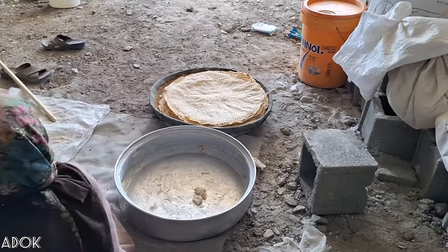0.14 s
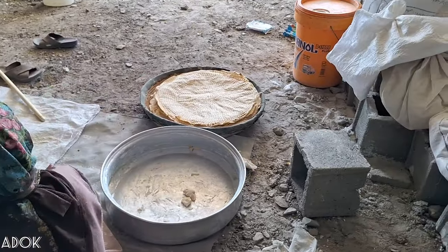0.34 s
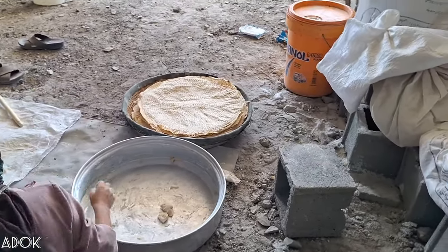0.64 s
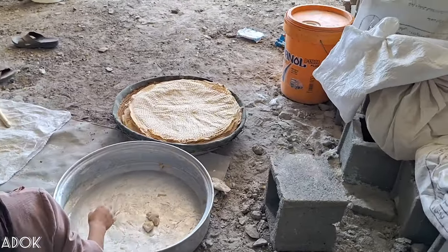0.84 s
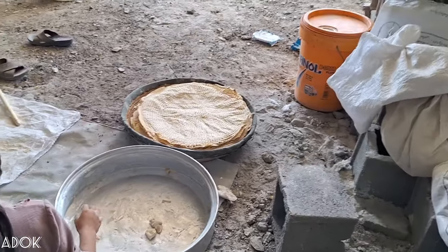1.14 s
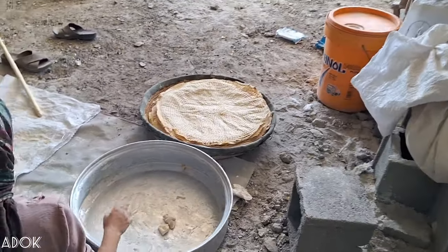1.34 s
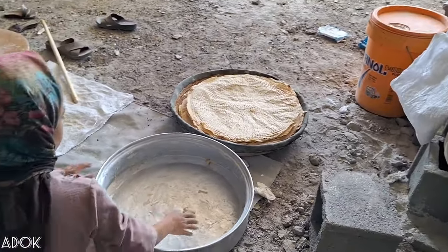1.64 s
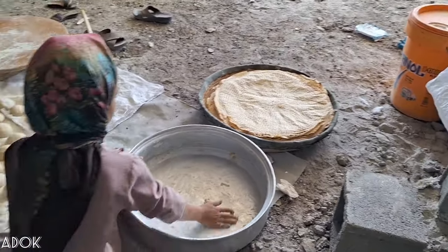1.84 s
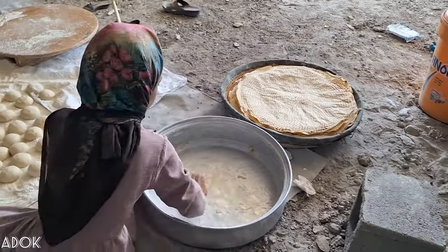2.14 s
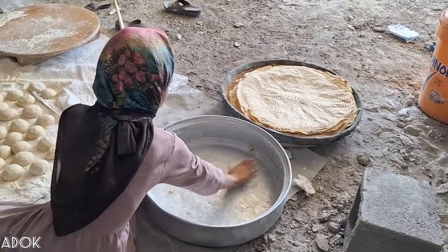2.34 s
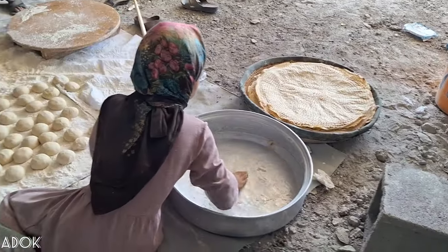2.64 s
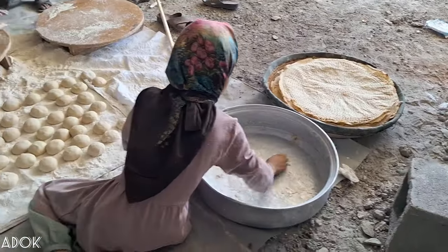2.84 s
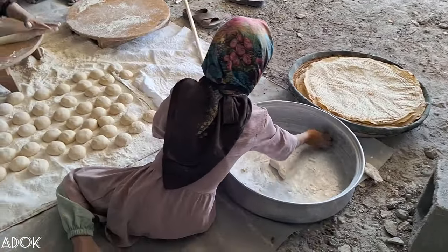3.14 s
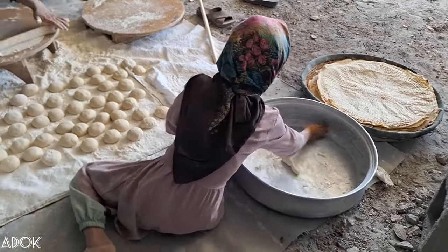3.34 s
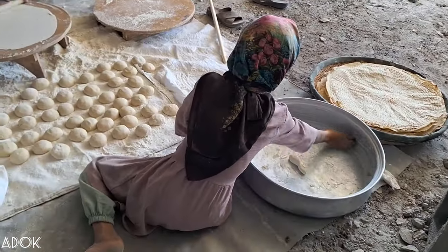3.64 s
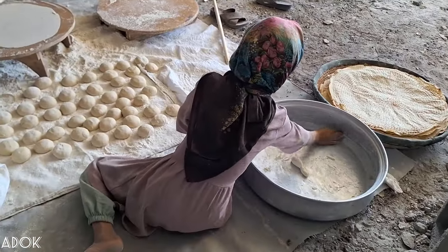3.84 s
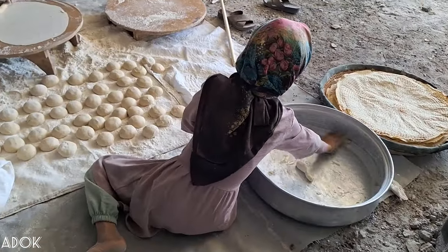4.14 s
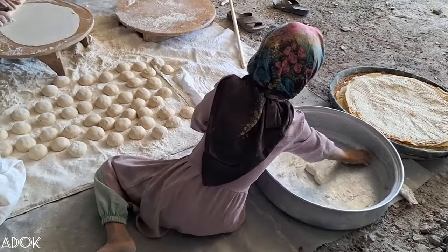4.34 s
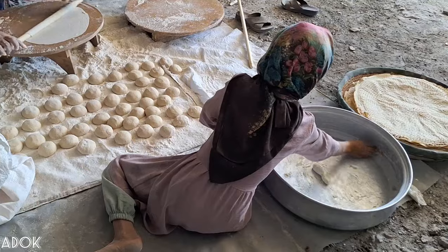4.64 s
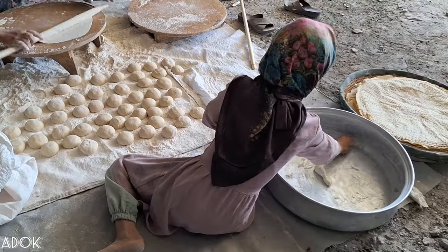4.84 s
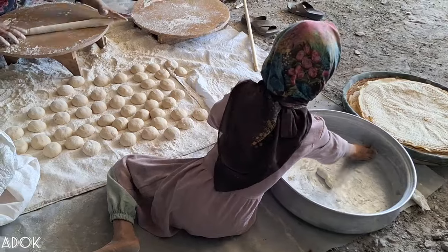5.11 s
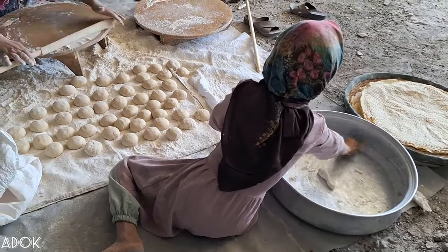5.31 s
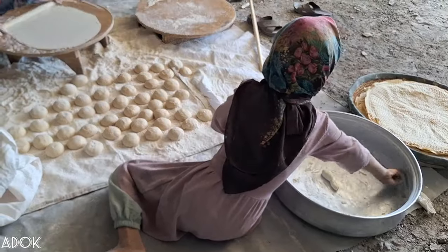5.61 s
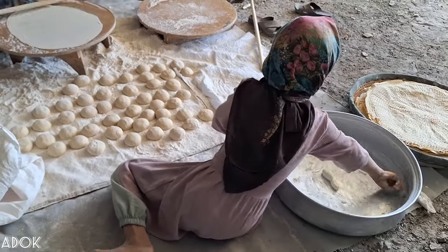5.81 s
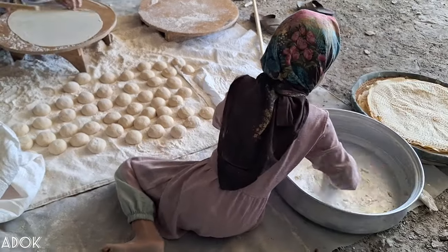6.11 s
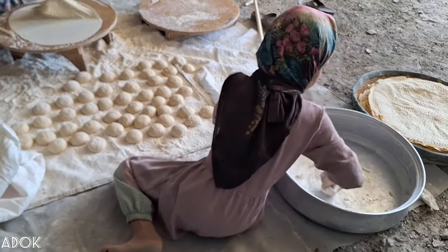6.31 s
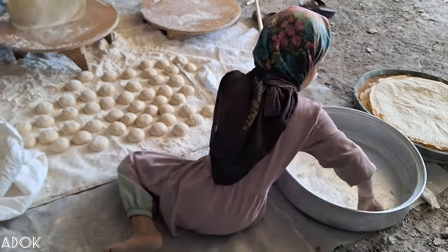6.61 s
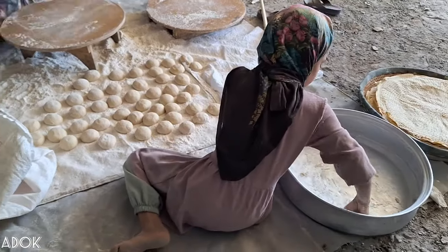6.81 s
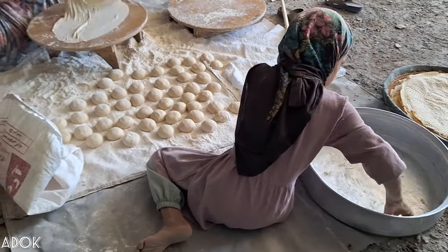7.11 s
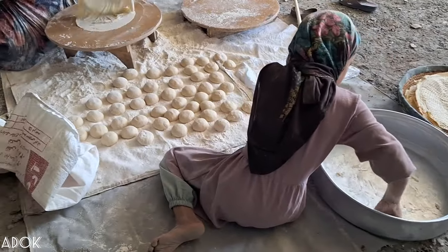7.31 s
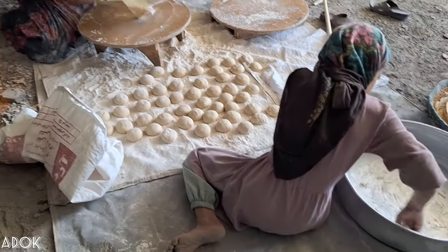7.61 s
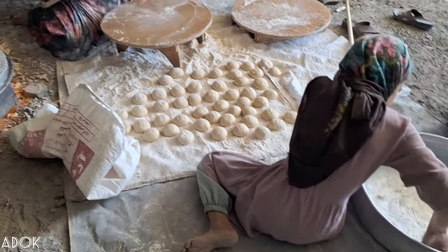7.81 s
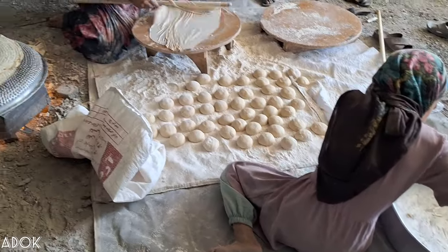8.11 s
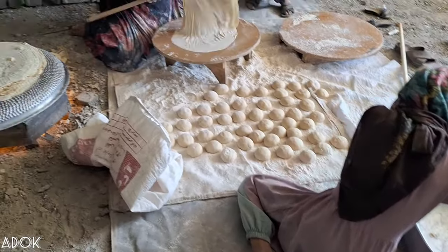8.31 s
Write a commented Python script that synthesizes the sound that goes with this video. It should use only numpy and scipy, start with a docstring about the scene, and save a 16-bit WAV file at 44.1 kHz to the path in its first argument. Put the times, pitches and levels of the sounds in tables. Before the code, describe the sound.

Flatbread is being made outdoors: a wooden pin rolls and lands on a board with hollow knocks and soft thuds, while hands rub and scrape flour in a metal basin. Crumbs and nails click, and the rubbing sometimes catches in tiny squeaks. Louder swishes and a wooden drag come toward the end. A faint gas burner hiss lies underneath, shifting slightly as the stereo microphone turns.

```python
"""A floury swish and a knock on wood: flatbread is being made on a gravel yard. A pin knocks and rolls
on a low wooden board, ringing its modes while the ground thuds along. Hands sweep flour over the board
and a wide metal basin, a gritty rub that now and then catches and sings; near the end the bare pin drags.
Crumbs and nails tick, and a gas burner hisses to one side of a turning handheld stereo microphone."""
import sys
import numpy as np
from scipy import signal
from scipy.fft import rfft, irfft, next_fast_len
from scipy.io import wavfile

SR = 44100
rng = np.random.default_rng(int(sys.argv[2]) if len(sys.argv) > 2 else 0)


def master_out(mix):
    """Clip the mix to full scale and print it as 16-bit PCM to the path in sys.argv[1]."""
    frames = np.transpose(np.atleast_2d(mix))
    ceiling = np.clip(frames, -1, 1)
    pcm = np.round(ceiling * 32767).astype(np.int16)
    wavfile.write(sys.argv[1], SR, pcm)


N = 373086
PADDED = next_fast_len(N + SR // 5, real=True)
HZ = np.maximum(np.arange(PADDED // 2 + 1) * SR / PADDED, 1)
FLANK_DB, ROUNDNESS = 20, 1.5   # a gesture's drop one swell before or one fade after its peak; its curve


def amp(db):
    """Decibels to gain."""
    return 10 ** (np.asarray(db) / 20)


def in_time(rows):
    """Each column of an automation table, one value per sample."""
    times, *columns = np.transpose(rows)
    return [np.interp(np.arange(N) / SR, times, column) for column in columns]


def over_hz(points):
    """A curve spread over all frequencies on a log axis."""
    hz, value = np.transpose(points)
    return np.interp(np.log(HZ), np.log(hz), value)


def modes(table, share):
    """A body's response: a flat path blended with resonances of alternating sign."""
    ring = sum((-1) ** k * amp(level_db) * 1j * HZ * width / (hz ** 2 - HZ ** 2 + 1j * HZ * width)
               for k, (hz, width, level_db) in enumerate(table))
    return 1 - share + share * 4 * ring


def drift(rate_hz):
    """A slow random wobble of spread 1."""
    pole = np.exp(-80 * np.pi * rate_hz / SR)
    slow = signal.lfilter([1], [1, -2 * pole, pole * pole], rng.standard_normal(N // 40 + 2002))[2000:]
    return np.interp(np.arange(N) / 40, np.arange(len(slow)), slow / slow.std())


def grit(rough_db, slip_db, slip_hz):
    """Dense, uneven grains that catch and slip, in three streams: common, left, right."""
    size = amp(rough_db * np.minimum(rng.exponential(1, N), 5) + slip_db * drift(slip_hz))
    grains = size * rng.standard_normal((3, N))
    return grains / grains.std()


def gestures(rows, idle_db):
    """One force envelope a layer: each row swells and fades, adding in power over a resting level."""
    t = np.arange(0, N + 64, 64) / SR
    peak_s, swell, fade, level_db, *layers_db = np.transpose(rows)[:, :, None]
    away = np.abs(t - peak_s) / np.maximum(np.where(t < peak_s, swell, fade), 1 / SR)
    shape_db = level_db - FLANK_DB * away ** ROUNDNESS
    powers = [np.sum(amp(shape_db + layer_db) ** 2, axis=0) + amp(rest_db) ** 2
              for layer_db, rest_db in zip([0] + layers_db, idle_db)]
    return [np.interp(np.arange(N) / SR, t, np.sqrt(power)) for power in powers]


def ringing(rubbing, table, wander_db):
    """Rubbed modes that swell and fade as the contact moves over the body."""
    out = 0
    for hz, width, level_db in table:
        r = np.exp(-np.pi * width / SR)
        ring = signal.lfilter([1 - r * r], [1, -2 * r * np.cos(2 * np.pi * hz / SR), r * r], rubbing)
        out = out + amp(level_db + wander_db * drift(7)) * ring
    return out


# How alike the two microphone ports sound: (frequency [Hz], likeness [0-1])
PORT_LIKENESS = [(60, 0.79), (290, 0.99), (700, 0.87), (1500, 0.12), (5000, 0.16), (15000, 0.08)]
# How far the left port leads: (frequency [Hz], phase [rad])
PORT_LEAD = [(0, 0), (900, -1.43), (1810, 5), (2500, 7), (16000, 53.5)]
# Shading between the ports: (frequency [Hz], left minus right [dB])
PORT_SHADE = [(60, -11), (130, 3), (400, 0), (1200, 0.5), (2800, -7.5), (6000, 0.5), (9500, -4.5),
              (14000, -5)]
def heard(grains, force, response):
    """Grains under a force ring through a body and reach both ports; the force sets the mid level."""
    common, left, right = rfft(grains * force, PADDED)
    alike = np.clip(over_hz(PORT_LIKENESS), 0, 1)
    late = np.exp(-1j * np.interp(HZ, *np.transpose(PORT_LEAD)))
    shade = amp(over_hz(PORT_SHADE) / 2)
    mid_power = (shade ** 2 + shade ** -2 + 2 * alike * late.real) / 4
    response = response / np.sqrt(np.mean(np.abs(response) ** 2 * mid_power))
    shared = np.sqrt(alike) * common * [np.ones_like(late), late]
    diffuse = np.sqrt(1 - alike) * np.array([left, right])
    return irfft((shared + diffuse) * response * [shade, 1 / shade], PADDED)[:, :N]


# Whistles of the gas jets: (frequency [Hz], width [Hz], level [dB])
JET_WHISTLES = [(3900, 150, -2), (4600, 40, 6), (6720, 40, 3), (10330, 80, 5), (11500, 50, 1),
                (13250, 50, 9)]
# Tone of the burner and the yard: (frequency [Hz], level [dB])
BURNER_EQ = [(18, -45), (30, 2.5), (75, 13), (437, -23), (554, -2), (822, -12), (1670, 3.5), (2480, 0),
             (3870, 4.5), (7270, -4), (8300, -6), (9970, -1), (13000, -7), (16000, -4)]
def burner(level_db):
    """The bed: smooth jet noise with faint whistles over the hush of the yard."""
    tone = modes(JET_WHISTLES, share=0.35) * amp(over_hz(BURNER_EQ))
    return heard(grit(0.2, 1.0, 8.5), amp(level_db), tone)


# Wooden modes of the board: (frequency [Hz], width [Hz], level [dB])
BOARD_MODES = [(115.2, 16, 4.5), (225.5, 20, 2.5), (250.7, 13, -4), (287.6, 21.7, -2), (357, 41.5, -7),
               (437, 65, -2.5), (524, 43, -2.5), (593.8, 27.3, 1), (796, 17, -6.5), (901, 45, -1),
               (1125, 5.1, -7.5), (1304, 23, -3.5)]
# Tone of the board's rumble and of the ground's thud: (frequency [Hz], level [dB])
RUMBLE_EQ = [(76, -45), (130, -6.5), (351, 3.5), (479, 3), (587, -2), (700, 10), (910, -24), (1540, -120)]
GROUND_EQ = [(15, -57), (25, -38), (41, -12.5), (80, -3), (114, -5), (160, -11), (210, -15.5), (350, -120)]
# Pin and dough pressing the board, one row a roll:
# (peak time [s], swell [s], fade [s], rumble [dB], thud over rumble [dB], upper modes over rumble [dB])
PIN_ROLLS = [(0.45, 0.041, 0.15, -69, 8, 2), (1.0, 0.15, 0.22, -56, -15, -5.5),
             (1.45, 0.22, 0.12, -56.5, -9, -16.5), (1.79, 0.026, 0.19, -49, -8, -1),
             (2.26, 0.14, 0.15, -59, -9, 5), (2.62, 0.082, 0.082, -54.5, -18, 5.5),
             (2.82, 0.19, 0.19, -53, -22, -5), (3.17, 0.24, 0.73, -57, -15, -6.5),
             (3.41, 0.12, 0.32, -53.5, 2, -19), (3.88, 0.11, 0.22, -47, -24, -7.5),
             (4.37, 0.41, 0.13, -68.5, 1.5, 1.5), (4.86, 0.39, 0.18, -65.5, -4, -2.5),
             (5.19, 0.32, 0.22, -61.5, -42, -1.5), (5.48, 0.057, 0.23, -55, -8, -22),
             (5.62, 0.13, 0.99, -68.5, -4, -8.5), (6.18, 0.061, 0.1, -53.5, -8, -10),
             (6.59, 0.029, 0.18, -57, 7, 4.5), (6.8, 0.12, 0.12, -61, 7.5, 5.5),
             (7.05, 0.076, 0.073, -46, -8, 6.5), (7.36, 0.32, 0.094, -64, 2, -1.5),
             (7.71, 0.1, 0.14, -53, 0.5, -7.5), (8.1, 0.062, 0.086, -55, -9, 14.5),
             (8.33, 0.59, 0.23, -58, -2.5, -19)]
def board_rumble():
    """The low end: rolls and knocks shake the board, hard rolls its upper modes; the ground thuds along."""
    rolling, thud, upper = gestures(PIN_ROLLS, idle_db=[-83, -76.5, -83])
    force = np.hypot(rolling, knock_force("board"))
    tone = modes(BOARD_MODES, share=0.53) * amp(over_hz(RUMBLE_EQ))
    rumble = heard(grit(2.1, 1.55, 33), force, tone)
    low, high = [signal.sosfilt(signal.butter(4, 330, side, fs=SR, output="sos"), rumble)
                 for side in ("low", "high")]   # the upper modes start at 330 Hz
    ground = heard(grit(3.8, 3.5, 8.4), thud, amp(over_hz(GROUND_EQ)))
    return low + high * upper / rolling + ground


# Metal modes of the basin: (frequency [Hz], width [Hz], level [dB])
BASIN_MODES = [(1796, 120, -15.5), (2037, 29, -6.5), (2366, 88, -9.5), (2785, 170, -13.5), (3014, 72, -8.5),
               (3253, 42, -9), (3726, 42, -8), (4560, 17, -14)]
def basin(contact, wander_db):
    """The wide metal basin rings under a scrape or a rattle."""
    return ringing(contact, BASIN_MODES, wander_db)


# Crumbs and nails ticking: (time [s], level before panning [dB], pitch [Hz], rattle over click [dB])
CRUMB_TICKS = [(0.1458, -27, 10600, -25), (0.153, -30.5, 4380, -24), (0.512, -27, 3100, -16),
               (0.831, -38, 1780, -10), (1.182, -34, 1200, -22), (1.2185, -16.5, 3100, -7.5),
               (1.2202, -18, 3100, -15), (1.752, -28, 2860, -1.5), (2.432, -40, 1880, -1),
               (2.473, -45, 1250, -1), (2.834, -37, 1650, -17), (3.052, -39, 1215, -5),
               (3.293, -35, 3060, 4), (3.704, -38.5, 2880, -3), (5.287, -38, 1954, -8),
               (5.715, -37, 2620, 2), (8.253, -31, 1490, -7), (8.272, -29.5, 1910, -17),
               (8.324, -25.5, 1900, -28)]
def crumbs():
    """A rounded click, then a short rattle that rings the basin; left hears it sooner and softer."""
    clicks, rattles = np.zeros((2, 2, N + SR))
    t, lead = np.arange(SR // 5) / SR, round(0.0005 * SR)
    noises = rng.standard_normal((len(CRUMB_TICKS), 2, len(t)))
    for (start_s, level_db, hz, rattle_db), noise in zip(CRUMB_TICKS, noises):
        contact_s = min(0.0002, 0.7 / hz)
        click = np.sin(2 * np.pi * hz * t) * t / contact_s * np.exp(1 - t / contact_s)
        band = signal.butter(2, [hz / 1.5, hz * 1.5], "band", fs=SR, output="sos")
        rattle = amp(rattle_db - 60 * t / 0.13) * signal.sosfilt(band, noise)
        start = round(start_s * SR)
        for side, (at, side_db) in enumerate([(start - lead, -8), (start, -1)]):
            clicks[side, at:at + len(t)] += amp(level_db + side_db) * click
            rattles[side, at:at + len(t)] += amp(level_db + side_db) * rattle[side]
    return (clicks + rattles)[:, :N] + basin(rattles[:, :N] + 1e-18, wander_db=-2)


# Squeaks in the rub: (peak time [s], swell [s], fade [s], level before panning [dB], pitch [Hz])
RUB_CATCHES = [(0.549, 0.021, 0.11, -49, 1255), (1.79, 0.033, 0.31, -55, 2280),
               (1.872, .015, 0.029, -46.5, 4510), (2.28, 0.046, 0.07, -49.5, 2830),
               (4.52, .03, .05, -56.5, 2230), (4.6, .05, .03, -61.5, 1740), (5.3, 0.013, .025, -57, 1640),
               (7.545, 0.024, 0.057, -47, 1840), (7.605, 0.026, 0.042, -43.5, 1340),
               (7.762, 0.023, 0.051, -44, 3480), (8.195, 0.059, 0.033, -39, 3280),
               (7.608, .02, 0.027, -45, 3350), (7.76, .025, 0.026, -49, 1810),
               (3.39, 0.041, .05, -50, 1050), (5.61, 0.088, .05, -55, 3000)]
def catches():
    """The rubbing catches and briefly sings: noise in one narrow resonance, leaning right."""
    out, half = np.zeros((2, N + SR)), SR // 3
    t = np.arange(-half, half) / SR
    r = np.exp(-np.pi * 85 / SR)   # 85 Hz wide
    noises = rng.standard_normal((len(RUB_CATCHES), 2, len(t)))
    for (peak_s, swell, fade, level_db, hz), noise in zip(RUB_CATCHES, noises):
        sung = signal.lfilter([1], [1, -2 * r * np.cos(2 * np.pi * hz / SR), r * r], noise)
        sung /= sung.std(axis=1, keepdims=True)
        shape_db = level_db - FLANK_DB * (np.abs(t) / np.where(t < 0, swell, fade)) ** ROUNDNESS
        at = round(peak_s * SR) - half
        out[:, at:at + len(t)] += amp(shape_db) * sung * amp([[-3], [3]])
    return out[:, :N]


# Bending modes of the pin: (frequency [Hz], width [Hz], level [dB])
PIN_MODES = [(1042, 15, -2), (1363, 70, -7.5), (1592, 46, -2), (1790, 70, -9), (3277, 35, 5.5),
             (3450, 24, -5)]
def pin_drag(force):
    """The bare pin drags over the board and friction rings its bending modes."""
    friction = heard(grit(3.0, 2.0, 20), force, amp(over_hz(WOOD_EQ)) + amp(over_hz(SCRAPE_EQ)))
    return amp(-7.5) * ringing(friction, PIN_MODES, wander_db=4)


# Tone of coarse scrape, fine flour and hollow wood: (frequency [Hz], level [dB])
SCRAPE_EQ = [(940, -36), (1600, -7), (2560, -2.5), (3340, 4.5), (4570, -1.5), (5200, -6), (6760, -9.5),
             (11400, -120)]
FLOUR_EQ = [(2820, -19), (4800, -5.5), (6460, -2.5), (7440, -1), (8400, -11.5), (9720, -6), (11700, -6.5),
            (15100, -14.5), (16000, -0.5)]
WOOD_EQ = [(350, -37), (600, 0), (690, 1), (1340, 7), (1900, 4.5), (2470, -9), (4180, -120)]
# Crossfade from hands to the bare pin: (time [s], share of the rubbing [0-1])
PIN_SHARE = [(0, 0), (7.3, 0.06), (7.41, 0.68), (8.0, 0.67), (8.03, 0), (8.15, 0.24), (8.3, 0.81),
             (8.46, 0.85)]
# Hands sweeping flour, one row a stroke:
# (peak time [s], swell [s], fade [s], scrape [dB], hiss over scrape [dB], wood over scrape [dB])
HAND_SWEEPS = [(0.03, 0.42, 0.14, -60.5, -2.5, -7.5), (0.54, 0.18, 0.35, -56.5, -3.5, -12),
               (0.95, 0.17, 0.26, -58, -3.5, -7.5), (1.18, 0.22, 0.17, -51.5, 2, -9.5),
               (1.53, 0.25, 0.29, -51.5, 1.5, -9.5), (1.8, 0.02, 0.6, -47.5, -22, -9),
               (1.94, 0.065, 0.14, -50, 2, -6), (2.275, 0.12, 0.12, -46, -2, -7),
               (2.63, 0.15, 0.12, -48, -1, -4), (2.78, 0.075, 0.3, -58.5, -3, -4.5),
               (3.17, 0.18, 0.9, -52.5, -1, -5), (3.4, 0.14, 0.085, -44.5, -7.5, -3),
               (3.58, 0.5, 0.18, -55, 3.5, -23), (3.8, 0.36, 0.31, -55.5, -37, -19.5),
               (4.0, 0.17, 0.12, -51.5, -17, -5.5), (4.39, 0.08, 0.15, -61, -0.5, -3.5),
               (4.53, 0.11, 0.79, -57, -9, -32), (4.85, 0.11, 0.59, -59.5, -21, -26),
               (5.23, 0.26, 0.13, -52, -1.5, -13), (5.54, 0.15, 0.28, -56.5, 5.5, -4.5),
               (5.735, 0.44, 0.043, -48, -5.5, -14), (5.9, .2, 0.26, -55.5, -25, -20),
               (6.3, 0.37, 0.2, -63.5, -12, -3), (6.58, 0.015, 0.11, -49.5, -3, 4),
               (6.8, .2, 0.15, -49.5, -5, 0), (6.985, 0.023, 0.18, -37.5, -6, -12),
               (7.06, 0.056, 0.063, -33, -5.5, -2), (7.3, 0.18, 0.13, -53.5, -3.5, -1),
               (7.43, 0.02, 0.072, -46, -6.5, -31), (7.535, 0.029, 0.19, -45, -12, -25),
               (7.61, 0.12, 0.22, -48.5, -5, 0), (7.76, 0.11, 0.096, -45.5, -5.5, -6),
               (7.89, 0.078, 0.097, -43, -8, -9.5), (8.04, 0.033, 0.15, -49, 5.5, 7),
               (8.1, 0.079, 0.13, -35.5, -3.5, -3.5), (8.2, 0.091, 0.13, -49.5, -6, 0),
               (8.37, 0.07, 0.073, -43.5, -11, -7.5), (8.44, 0.043, 0.16, -41.5, -13, -12)]
def sweeps(basin_share):
    """Strokes and slaps drive coarse grit, flour hiss, hollow wood and the ring of basin or pin."""
    coarse, fine, woody = gestures(HAND_SWEEPS, idle_db=[-75, -72, -86])
    on_pin, in_basin = np.clip(in_time(PIN_SHARE)[0], 0, 1), np.clip(basin_share, 0, 1)
    slap = knock_force("slap")
    rub, hollow = np.hypot(coarse, slap), np.hypot(woody, knock_force("wood"))
    grains = grit(2.14, 1.3, 28.5)   # shared by scrape and hiss
    scrape = heard(grains, rub * np.sqrt(1 - on_pin), amp(over_hz(SCRAPE_EQ)))
    hiss = heard(grains, np.hypot(fine, amp(-6) * slap), amp(over_hz(FLOUR_EQ)))
    wood_tone = modes(BOARD_MODES, share=0.48) * amp(over_hz(WOOD_EQ))
    wood = heard(grit(2.54, 2.17, 29), hollow * np.sqrt(1 - on_pin), wood_tone)
    pin = pin_drag(np.hypot(rub, hollow) * np.sqrt(on_pin))
    metal = basin(scrape * np.sqrt(in_basin), wander_db=4)
    return scrape * np.sqrt(1 - in_basin) + metal + hiss + wood + pin


# Pin or palm landing on the board: (time [s], relative level [dB], wood over level [dB],
# slap over level [dB], pitch of the spot [Hz], time for the force to fall 60 dB [s])
LANDINGS = [(0.11, -43.5, -7, -2, 208, 0.17), (0.525, -40, 9.5, -18, 228, 0.31),
            (0.979, -52, 4, 6, 297, 0.24), (1.588, -40, -4.5, -20, 546, 0.3),
            (1.75, -36.5, -5.5, -10, 248, 0.44), (2.731, -40.5, 4, 6.5, 580, 0.13),
            (3.818, -42.5, -0.5, -5.5, 400, 0.42), (3.921, -41, -22, -8, 228, 0.37),
            (4.614, -50, -3.5, 1, 555, 0.46), (4.8, -51, -23, -14, 125.8, 0.43),
            (5.181, -42, -5, -14, 292, 0.11), (5.461, -42, -8, -33, 110, 0.072),
            (6.152, -50, -1.5, -17, 220, 0.54), (6.568, -34.5, 9.5, 5.5, 276, 0.17),
            (6.63, -36, -27, -32, 113, 0.073), (6.969, -45.5, 14.5, 17, 590, 0.21),
            (7.656, -45.5, 11, -8, 600, 0.18), (8.024, -41.5, -5, -6, 370, 0.29)]
def knock_force(layer):
    """Each landing gives the "board", "wood" or "slap" noise layer a sudden push that dies away."""
    force, t = np.zeros(N + SR), np.arange(SR // 2) / SR
    for start_s, level_db, wood_db, slap_db, _, t60 in LANDINGS:
        layer_db = {"board": 0, "wood": wood_db, "slap": slap_db}[layer]
        at = round(start_s * SR)
        force[at:at + len(t)] += amp(level_db + layer_db - 12 - 60 * t / t60)
    return force[:N]


def knocks():
    """A landing rings the low board modes near the struck spot's pitch, the top ones by its hardness."""
    out, t = np.zeros(N + SR), np.arange(SR // 3) / SR
    hz, width, mode_db = np.transpose(BOARD_MODES)[:, :, None]
    variations_db = 2.5 * rng.standard_normal((len(LANDINGS), len(BOARD_MODES), 1))
    for (start_s, level_db, wood_db, _, spot_hz, t60), vary_db in zip(LANDINGS, variations_db):
        struck_db = np.where(hz > 1000, wood_db - 16.5, -25 * np.log2(hz / spot_hz) ** 2) + vary_db
        decay = np.exp(-np.pi * width * t * 0.12 / t60)   # a 0.12 s landing keeps the listed widths
        rings = amp(level_db - 10 + mode_db + struck_db) * decay * np.sin(2 * np.pi * hz * t)
        at = round(start_s * SR)
        out[at:at + len(t)] += rings.sum(0)
    return out[:N]


# Automation as the microphone turns:
# (time [s], burner level [dB], treble left minus right [dB], share of the scrape in the basin [0-1])
MIC_TURN = [(0, -68, -12, 0.89), (1, -64, -10.5, 0.13), (1.6, -59, -7.5, 0.65), (3.2, -62.5, -6.5, 0.7),
            (4, -66.5, -8.5, 0.81), (5, -66.5, -8.5, 0.7), (5.7, -73, -7, 0.87), (6.4, -66, -8.5, 0.62),
            (7, -64, -7, 0.27), (8.46, -72, -7, 0.04)]
def scene():
    """The bright layers swing between the ports as the microphone turns; rumble and knocks stay put."""
    burner_db, pan_db, basin_share = in_time(MIC_TURN)
    swing = amp((pan_db + 5.5) / 2 * np.array([[1], [-1]]))   # about the left port's usual 5.5 dB shade
    bright = sweeps(basin_share) + burner(burner_db) + crumbs() + catches()
    return bright * swing + board_rumble() + knocks()


def record(dry):
    """The microphone rolls off below 40 Hz; the top is cut steeply at 16 kHz."""
    thin = signal.sosfilt(signal.butter(2, 40, "high", fs=SR, output="sos"), dry)
    return signal.sosfilt(signal.cheby2(20, 70, 16000, fs=SR, output="sos"), thin)


dry = scene()
out = record(dry)
master_out(out)
```